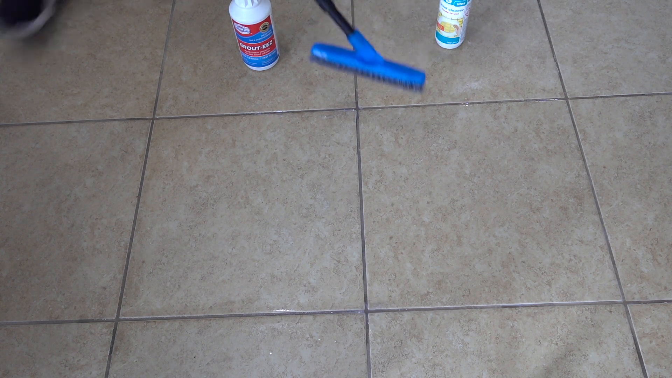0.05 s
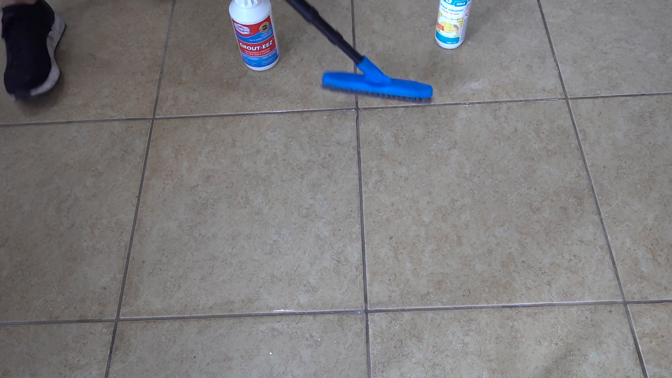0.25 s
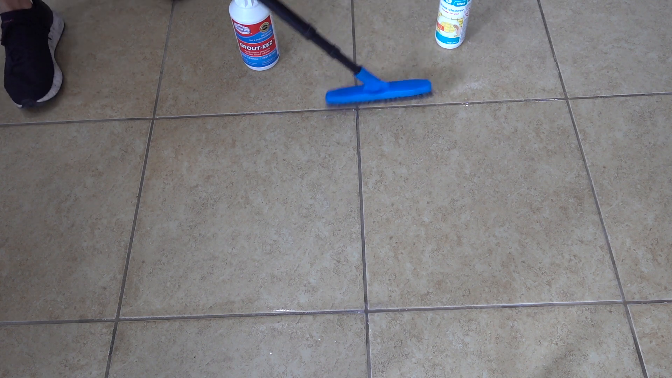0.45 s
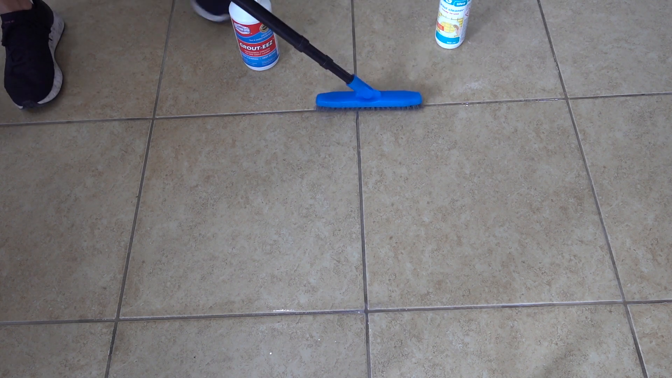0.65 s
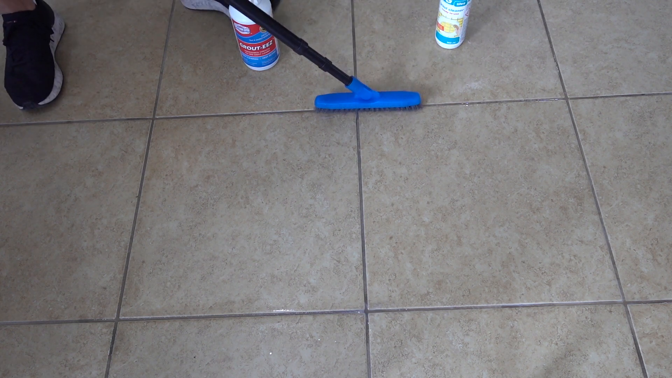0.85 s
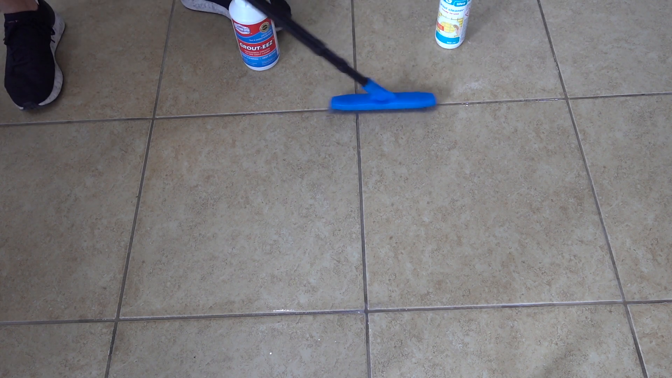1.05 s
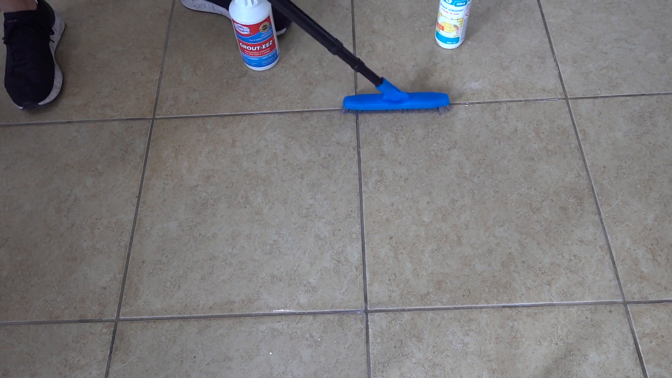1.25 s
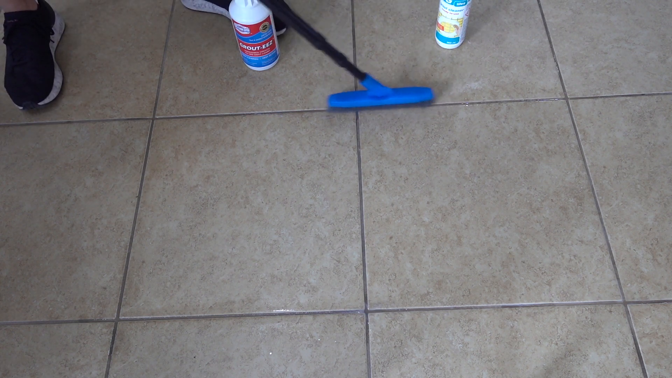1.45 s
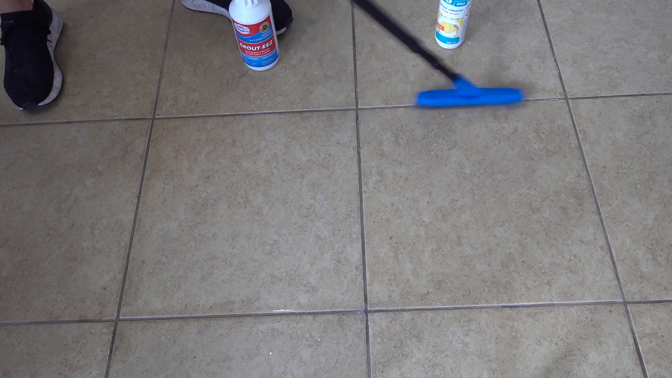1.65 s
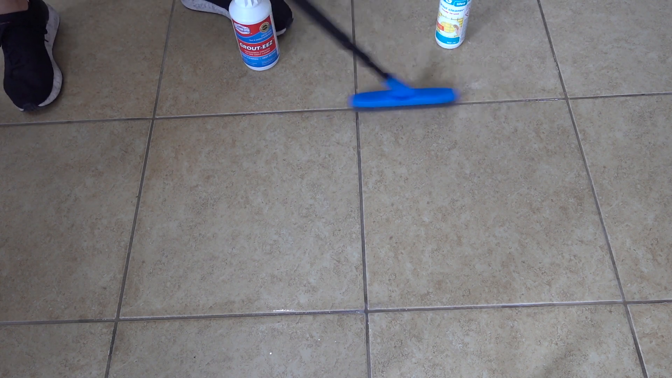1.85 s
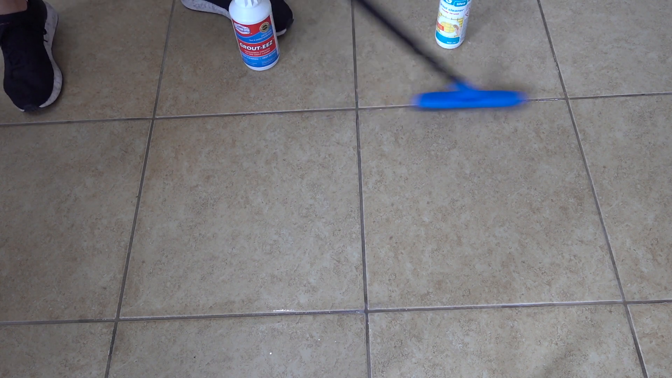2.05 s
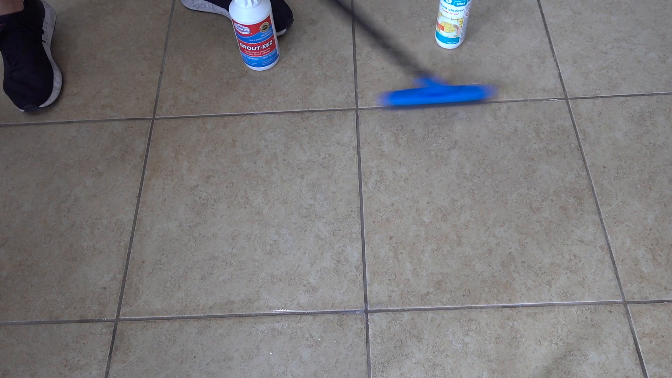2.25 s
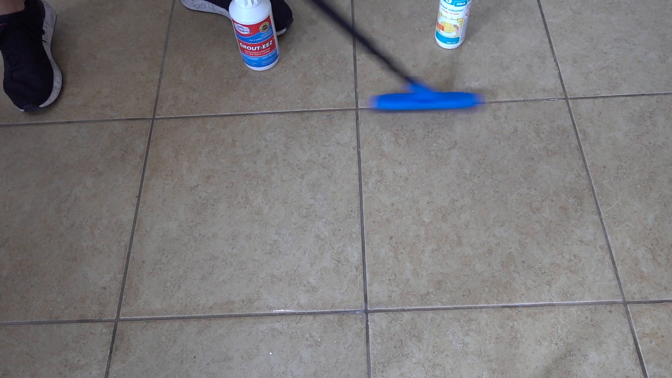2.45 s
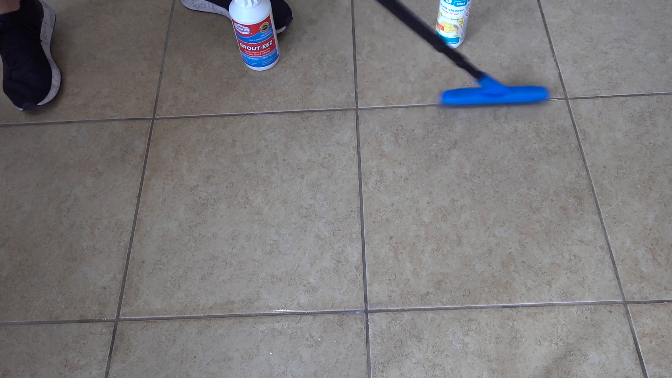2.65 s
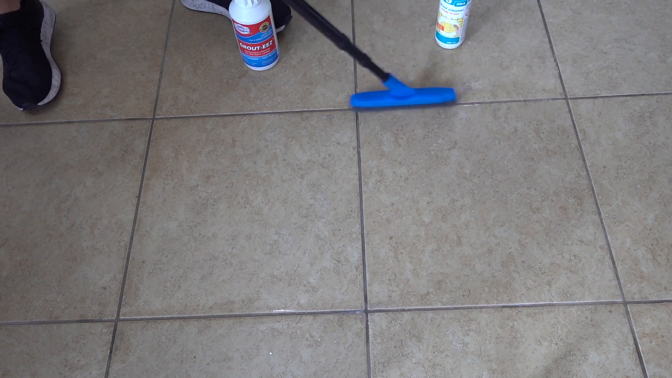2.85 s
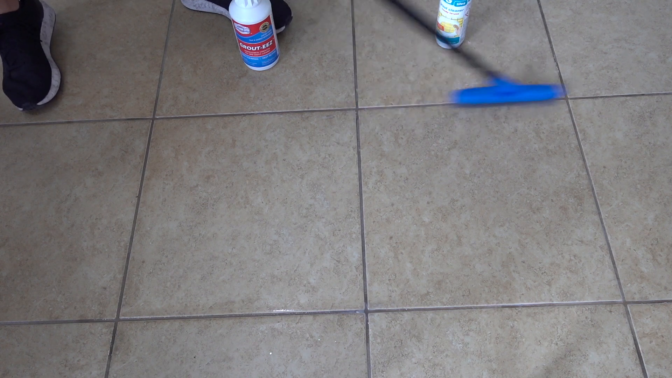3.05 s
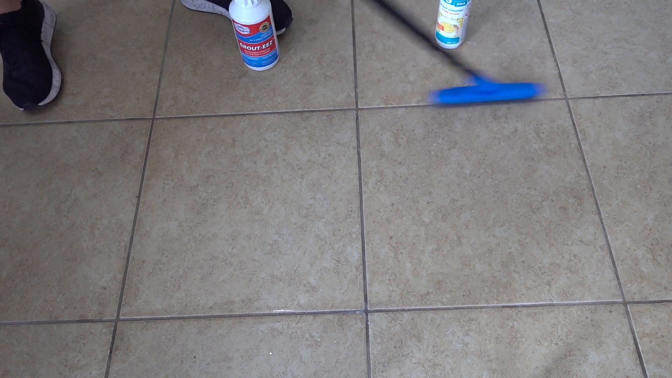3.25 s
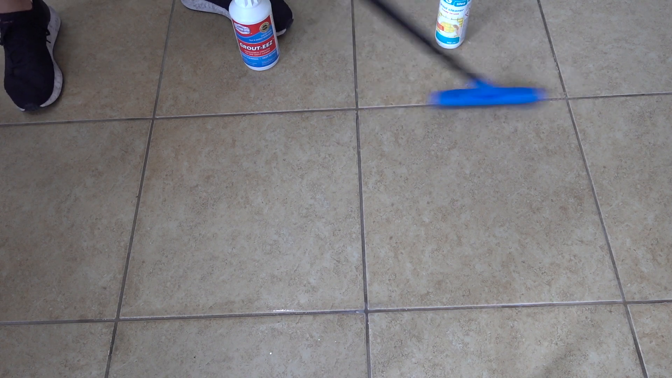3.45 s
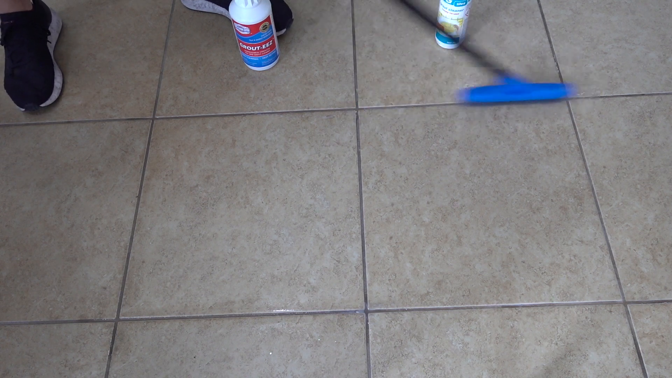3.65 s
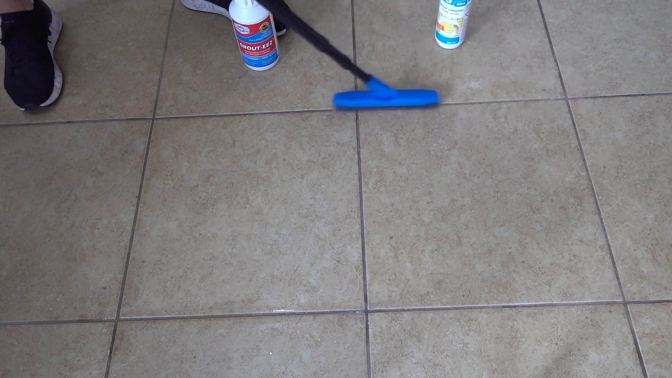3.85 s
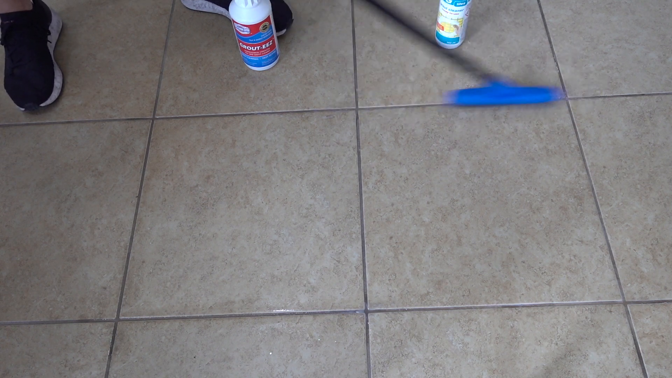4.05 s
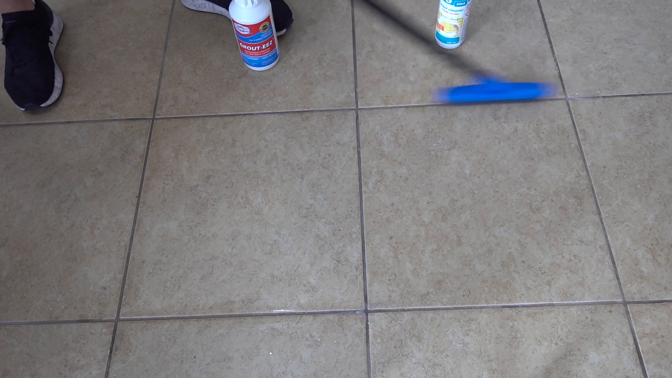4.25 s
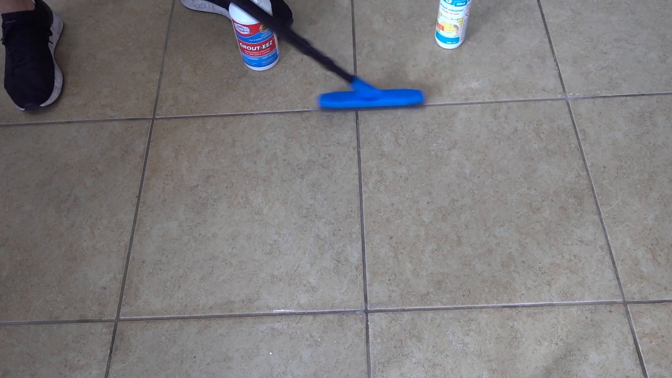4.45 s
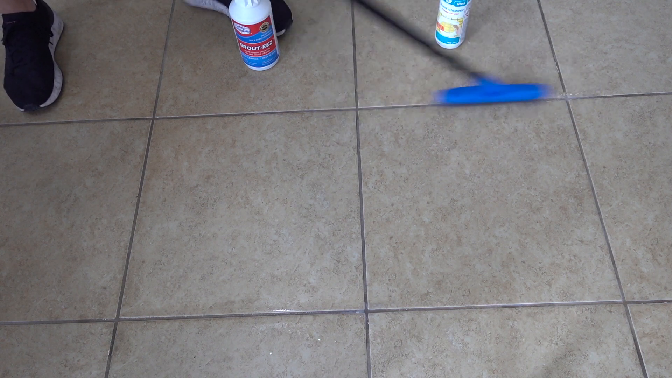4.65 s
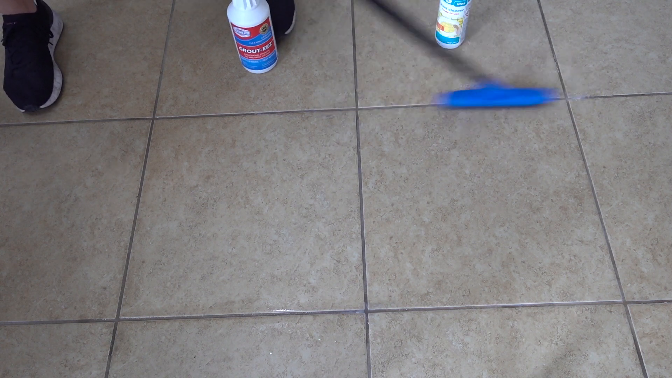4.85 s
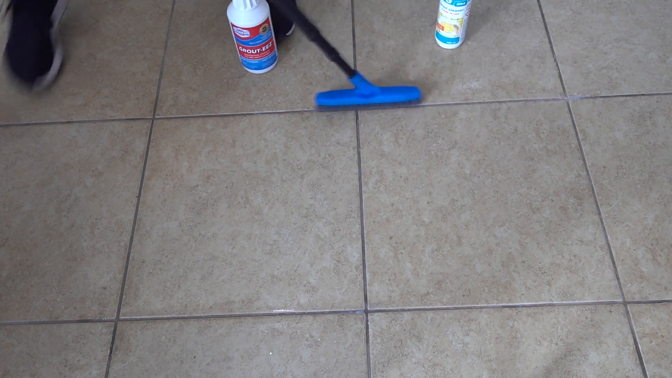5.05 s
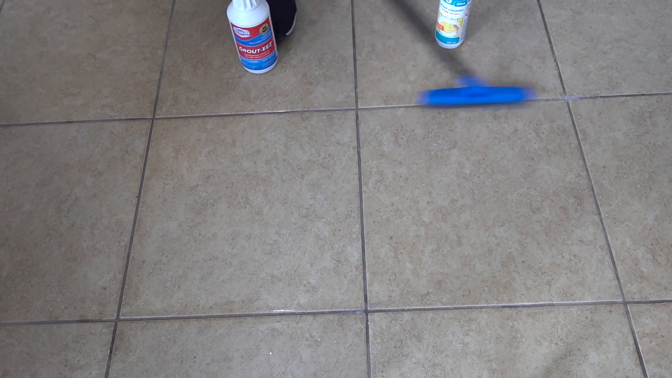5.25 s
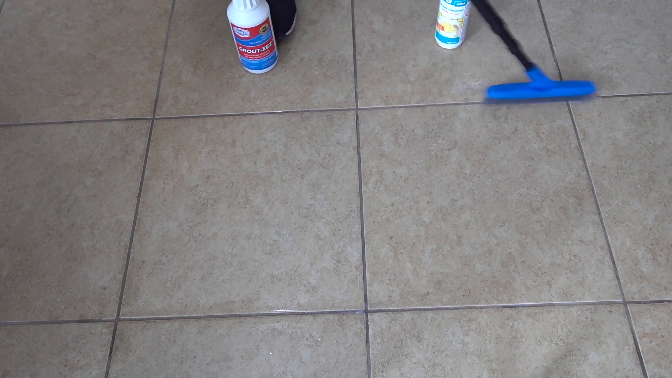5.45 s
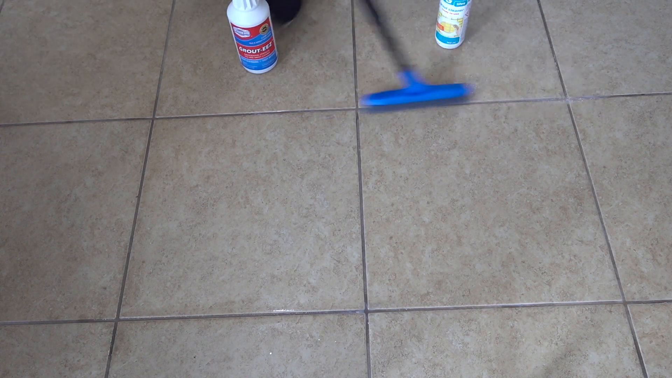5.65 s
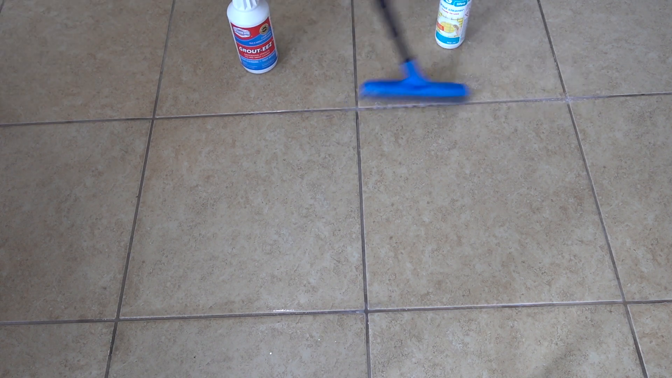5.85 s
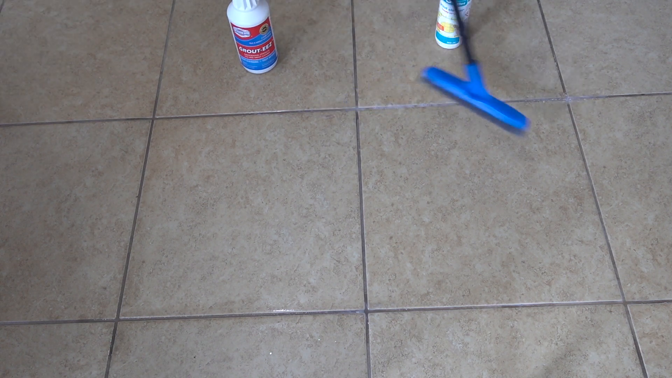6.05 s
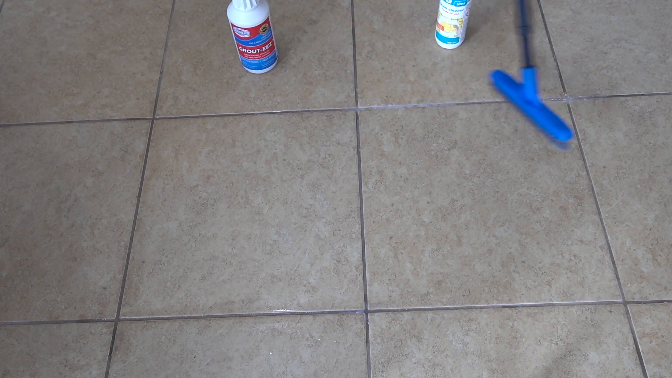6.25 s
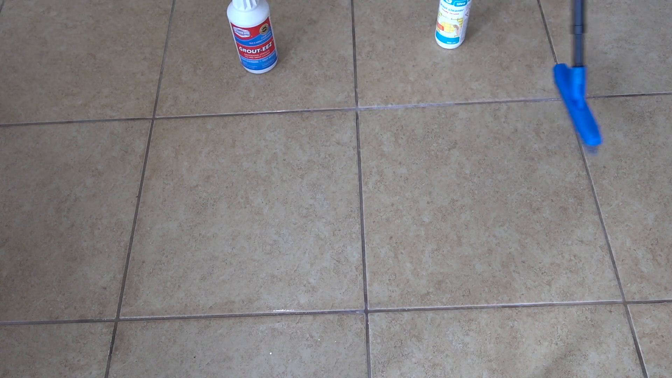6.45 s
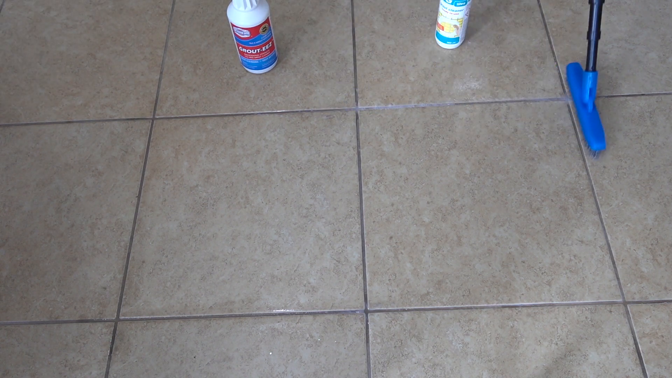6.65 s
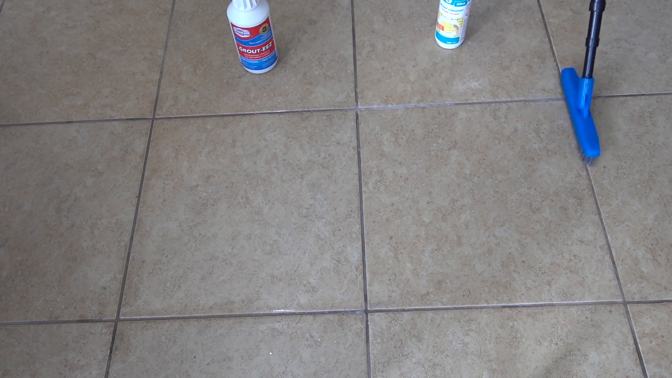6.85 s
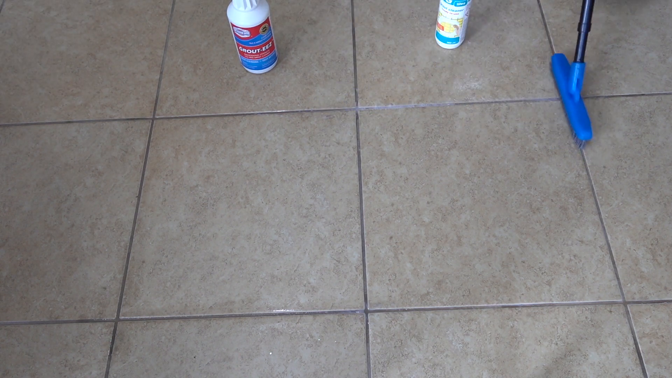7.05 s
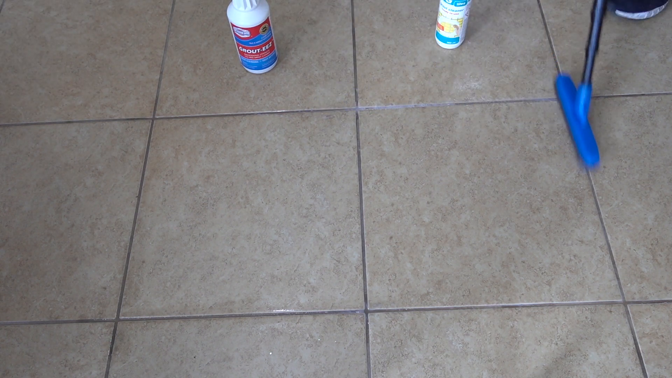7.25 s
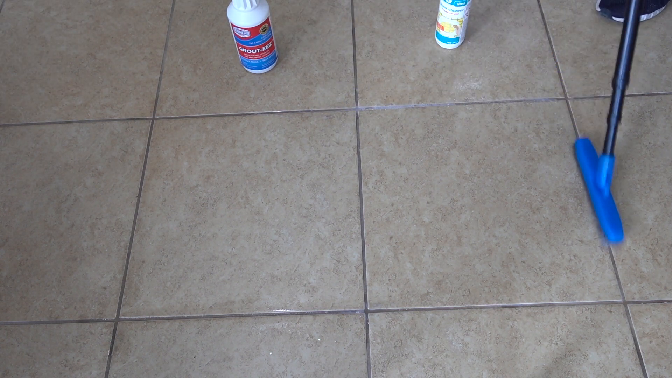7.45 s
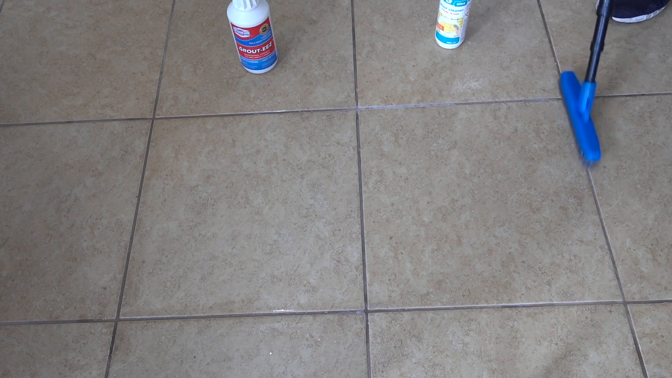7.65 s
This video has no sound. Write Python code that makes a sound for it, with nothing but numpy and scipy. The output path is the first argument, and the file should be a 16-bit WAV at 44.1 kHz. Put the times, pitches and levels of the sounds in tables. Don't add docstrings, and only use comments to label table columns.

```python
import sys
import numpy as np
from scipy import signal
from scipy.fft import rfft, irfft, next_fast_len
from scipy.io import wavfile
from scipy.ndimage import uniform_filter1d, map_coordinates

SR = 44100
rng = np.random.default_rng(int(sys.argv[2]) if len(sys.argv) > 2 else 0)


def generate_wav(signal):
    frames = np.transpose(np.atleast_2d(signal))
    scaled = np.clip(frames, -1, 1) * 32767
    pcm = np.round(scaled).astype(np.int16)
    wavfile.write(sys.argv[1], SR, pcm)


def nominal_scale(level):
    x = np.asarray(level, float) / 20
    return 10 ** x


N = 340452


def unit(x):
    return x / np.sqrt(np.mean(x ** 2) + 1e-20)


def along(points, hz):
    f, v = np.transpose(points)
    return np.interp(np.log(hz + 1), np.log(f + 1), v)


def wobble(rate_hz):
    knots = rng.standard_normal(int(N * rate_hz / SR) + 4)
    return map_coordinates(knots, [np.arange(N) * rate_hz / SR])


def sigmoid(x):
    return 1 / (1 + np.exp(np.clip(-x, -30, 30)))


def filtered(x, response):
    m = next_fast_len(len(x) + SR // 2)
    return irfft(rfft(x, m) * response(np.fft.rfftfreq(m, 1 / SR)), m)[:len(x)]


def modes(table):
    def response(f):
        total = 0
        for k, (centre, width, db) in enumerate(table):
            resonance = 1j * f * width / (centre * centre - f * f + 1j * f * width)
            total = total + (-1) ** k * nominal_scale(db) * resonance
        return total
    return response


def colour(spectrum):
    return lambda f: nominal_scale(along(spectrum, f))


def slips(share, spread_db):
    kick, size = rng.standard_normal((2, N))
    return (rng.random(N) < share) * kick * nominal_scale(spread_db * size)


def patchy(x, depth_db):
    z = signal.stft(x, nperseg=512)[2]
    field = uniform_filter1d(rng.standard_normal(z.shape), size=8, axis=0)
    field = uniform_filter1d(field, size=14, axis=1)
    return signal.istft(z * nominal_scale(depth_db * unit(field)), nperseg=512)[1][:N]


# (frequency [Hz], t60 [s])
ROOM_T60 = [(200, 0.29), (1000, 0.696), (3000, 0.746), (6000, 0.86), (10000, 0.48)]


def room(x, wet_db, early_db):
    hz, t, z = signal.stft(rng.standard_normal(SR // 2), SR, nperseg=256)
    t60 = along(ROOM_T60, hz)[:, None]
    late = nominal_scale(wet_db - 60 * t / t60) / np.sqrt(t60)
    early = nominal_scale(early_db - 60 * t / 0.0976) / np.sqrt(.12)
    tail = signal.istft(z * (late + early), SR, nperseg=256)[1] * np.sqrt(6 * np.log(10) / SR)
    return signal.fftconvolve(np.pad(x, (SR // 300, 0)), tail)


def renewed_room(x, wet_db, early_db):
    out, hop = np.pad(x, (0, SR)), SR // 3
    for i in range(0, N, hop):
        answer = room(x[i:i + hop], wet_db, early_db)
        out[i:][:len(answer)] += answer
    return out[:N]


# (frequency [Hz], density [dB])
AIR_TONE = [(59, -28.5), (100, -2.5), (287, -1.5), (348, 0.5), (531, -5), (779, -8.5), (1210, -10),
            (1580, -14), (5100, -19), (9800, -26.5), (12700, -55.5), (21600, -120)]
# (frequency [Hz], width [Hz], level [dB])
MACHINE_HUM = [(129.9, 12, 0.5), (235.4, 20, -7.5), (621.7, 60, -12.5)]
# (frequency [Hz], density [dB])
RUMBLE = [(15, -19), (28, -7), (52, 1), (80, -5), (110, -11), (200, -33.5)]
# (time [s], width [s], level over the calm [dB])
STIRRED_AIR = [
    (.77, 0.066, 6),
    (3.6, 2.6, 4.5),
    (5.2, 0.106, 4),
    (5.6, .4, 2.5),
    (6.23, 0.063, 6),
    (6.23, 0.014, 2.5),
    (6.41, 0.049, 9),
    (6.9, 0.095, 4),
    (7.6, 0.28, 5),
]
AIR_DB, HUM_DB, RUMBLE_DB = -52.5, -62, -58


def air():
    tone = unit(patchy(filtered(rng.standard_normal(N), colour(AIR_TONE)), depth_db=2.32))
    hum = unit(filtered(rng.standard_normal(N), modes(MACHINE_HUM)))
    lumps = unit(nominal_scale(wobble(6.6)) * filtered(rng.standard_normal(N), colour(RUMBLE)))
    t = np.arange(N) / SR
    stir_db = RUMBLE_DB + sum(db * np.exp(-((t - s) / width_s) ** 2) for s, width_s, db in STIRRED_AIR)
    out = nominal_scale(AIR_DB - 2.5 + 0.34 * wobble(3.8)) * tone
    out += nominal_scale(HUM_DB + 1.3 * wobble(2.912)) * hum
    return out + nominal_scale(stir_db + 1.9 * wobble(4.5)) * lumps


# (time [s], fade by 20 dB [s], thump [dB], drag re thump [dB], scuff re thump [dB])
SHOE_SHIFTS = [
    (1.17, 0.28, -61, 3, 10),
    (4.97, 0.166, -34.5, -5.5, -4.5),
    (5.065, .09, -48, 5, 4),
    (7.4, 0.6, -58, -1, 9.5),
    (5.625, 0.153, -46, -1.5, 1.5),
    (5.76, 0.1236, -58, -3, 11),
    (5.975, 0.07, -50, 2.5, -3.5),
    (6.195, 0.0943, -47.5, -10.5, 0.5),
    (6.335, 0.01, -46, -16, -5.5),
]
SHOE_ATTACK_S, LINGER = 0.0174, 1.35


def shifts():
    gains, t = np.zeros((3, N)), np.arange(N) / SR
    stretch = np.array([[1], [LINGER], [LINGER]])
    for s, fade_s, sole_db, drag_db, scuff_db in SHOE_SHIFTS:
        u = np.clip(t - s, 0, None)
        swell = 1 - np.exp(-(u / SHOE_ATTACK_S) ** 2)
        level_db = sole_db + np.array([[0], [drag_db], [scuff_db]])
        gains += nominal_scale(level_db - 20 * u / (fade_s * stretch)) * swell
    return gains


# (frequency [Hz], width [Hz], level [dB])
SOLE_MODES = [(132, 54, -1), (243.8, 115, 0.5)]
# (frequency [Hz], width [Hz], level [dB])
DRAG_MODES = [(446, 110, 0)]
# (frequency [Hz], density [dB])
SCUFF_COLOUR = [(300, -14.5), (600, -2), (1200, 1.5), (1700, -3.5), (3000, -22)]


def shoes():
    thump, pull, rub = shifts()
    sole = filtered(slips(0.046, spread_db=1.0), lambda f: modes(SOLE_MODES)(f) ** 2)
    sole = unit(nominal_scale(0.9 * wobble(36)) * sole)
    drag = unit(filtered(slips(.05, spread_db=3.5), lambda f: modes(DRAG_MODES)(f) ** 2))
    scuff = unit(filtered(slips(0.11, spread_db=3.0), colour(SCUFF_COLOUR)))
    return renewed_room(thump * sole + pull * drag + rub * scuff, wet_db=-5.5, early_db=-10.0)


# (time [s], body [dB], shell [dB], edge [dB], contact [ms])
FLAT_KNOCKS = [
    (.372, -50, -53.5, -66.5, 0.92),
    (.362, -44, -48.5, -60.5, 1.03),
    (.668, -29, -32, -42.5, 1.69),
    (0.7226, -20, -29, -34.5, 4.4),
    (0.7324, -26.5, -42, -38.5, 1.92),
    (6.889, -31, -26, -35, 1.77),
    (6.8912, -18.5, -18.5, -31.5, 1.1),
    (6.899, -27, -35.5, -37, 3.98),
]
# (time [s], body [dB], shell [dB], edge [dB], contact [ms])
END_TOUCHES = [
    (.585, -48, -52, -61.5, 1.9),
    (0.601, -59, -39.5, -45, 0.97),
    (.691, -38, -56.5, -47.5, 3.5),
    (.861, -60, -42.5, -48.5, 2.5),
    (1.1274, -55.5, -46.5, -34.5, 0.594),
    (1.132, -43.5, -49.5, -38.5, .6),
    (6.395, -40.5, -44, -59.5, 9.5),
    (6.675, -45, -62, -66, 2.64),
]
TOUCH_PITCH = 1.208
# (time [s], body [dB], shell [dB], contact [ms], pitch factor)
DULL_THUDS = [
    (1.091, -59, -66, 2.8, 0.64),
    (1.107, -58.5, -68, 3.7, 0.43),
    (4.981, -41, -72.5, 4.6, 0.374),
    (4.996, -32, -68, 10, 0.22),
    (5.019, -34, -69.5, 5.3, 0.47),
    (6.198, -34.5, -35, 0.48, 0.536),
    (7.425, -32, -45.5, 2.97, 0.486),
]
THUD_EDGE_DB = -20
# (frequency [Hz], width [Hz], level [dB])
BODY_MODES = [(211.3, 26.3, -5), (362.3, 98, -5), (597, 56.6, 2.5), (813, 87, -0.5), (1118, 147, -6)]
# (frequency [Hz], width [Hz], level [dB])
SHELL_MODES = [(1370, 450, -5), (2232, 273, 3.5), (2944, 410, -3), (3823, 580, -6.5)]
# (frequency [Hz], width [Hz], level [dB])
EDGE_MODES = [(5850, 1450, -1.5), (7300, 1500, -2.5), (8550, 1300, -8)]
KNOCK_GAIN_DB = 14.5


def knocks():
    out, t = np.zeros(N + SR), np.arange(SR // 10) / SR
    contacts = [(*row, 1) for row in FLAT_KNOCKS]
    contacts += [(*row, TOUCH_PITCH) for row in END_TOUCHES]
    for s, body_db, shell_db, ms, pitch in DULL_THUDS:
        contacts.append((s, body_db, shell_db, shell_db + THUD_EDGE_DB, ms, pitch))
    impulse = 1. * (t == 0)
    for s, body_db, shell_db, edge_db, ms, pitch in contacts:
        u = t / (ms / 1000)
        rattle = rng.standard_normal(len(t)) * np.sqrt(u) * np.exp(-u)
        blow = np.arange(len(t)) == np.argmax(u > .5)
        force = rattle / np.linalg.norm(rattle) + 0.72 * blow
        direct, clean_ring = np.zeros((2, len(t)))
        for db, table in ((body_db, BODY_MODES), (shell_db, SHELL_MODES), (edge_db, EDGE_MODES)):
            ring = lambda f: modes(table)(f / pitch)
            near, far = filtered(force, ring), filtered(impulse, ring)
            direct = direct + nominal_scale(db + KNOCK_GAIN_DB) * near / np.linalg.norm(near)
            clean_ring = clean_ring + nominal_scale(db + KNOCK_GAIN_DB) * far / np.linalg.norm(far)
        answer = room(clean_ring, wet_db=-5.5, early_db=-9)
        start = round(s * SR)
        out[start:][:len(direct)] += direct
        out[start:][:len(answer)] += answer
    return out[:N]


# (time [s], length [s], share before top speed, tip hiss [dB], bending re tips [dB])
BRUSH_STROKES = [(1.134, 0.3393, 0.447, -35.5, -4.5), (1.38, .2, .5, -50, -3),
                 (1.531, 0.129, 0.511, -33.5, -8), (1.666, 0.2525, 0.475, -26.5, -1),
                 (1.927, 0.189, 0.381, -23, -5), (2.118, 0.2463, 0.452, -26, 3),
                 (2.359, 0.2284, 0.44, -21, -4), (2.578, 0.278, 0.471, -25, 3),
                 (2.85, 0.231, 0.446, -21.5, -4), (3.068, 0.3042, 0.47, -22, 0.5),
                 (3.371, 0.212, 0.363, -20.5, -4.5), (3.582, 0.2194, 0.44, -21, -2),
                 (3.807, 0.276, 0.356, -19, -4.5), (4.075, 0.3138, 0.431, -20.5, -1),
                 (4.373, 0.298, 0.489, -19.5, -8), (4.661, 0.3486, 0.403, -19.5, -6.5),
                 (4.989, 0.3032, 0.357, -19.5, -7.5), (5.278, 0.404, 0.4414, -20.5, -3),
                 (5.651, 0.428, 0.301, -21.5, -7.5), (7.025, 0.3085, .68, -40.5, -11),
                 (7.22, .2, .5, -50, -3), (7.301, 0.374, 0.778, -25.5, -0.5),
                 (7.68, 0.213, 0.388, -21.5, -5)]
LIGHT_DB = -28
SLOW_S, SOFTEN_PER_S, SOFTEN_PER_DB = 0.176, 12.8, 0.2536
FLIP_S = 0.0389


def strokes(law, offset_db, share, grows=1):
    shift, rise, fall = law
    power, t = np.zeros(N), np.arange(N) / SR
    for s, length_s, top, tips_db, bend_db in BRUSH_STROKES:
        i, j = round(s * SR), round((s + length_s) * SR)
        u, at = (t[i:j] - s) / length_s, np.clip(top + shift, .1, .9)
        speeding_up = u < at
        ramp = np.where(speeding_up, u / at, (1 - u) / (1 - at))
        speed = np.sin(np.pi / 2 * np.clip(ramp, 0, 1))
        phase_s = length_s * np.where(speeding_up, top, 1 - top)
        soft = 1 + SOFTEN_PER_S * np.clip(phase_s - SLOW_S, 0, None)
        soft = soft + SOFTEN_PER_DB * max(LIGHT_DB - tips_db, 0)
        gain = nominal_scale(grows * tips_db + offset_db + share * bend_db)
        power[i:j] += (gain * speed ** (soft * np.where(speeding_up, rise, fall))) ** 2
    return 10 * np.log10(np.abs(uniform_filter1d(power, size=round(FLIP_S * SR))) + 1e-12)


# (frequency [Hz], width [Hz], level [dB])
PULLED_MODES = [(2125, 870, -21.5), (2741, 488.5, -3), (3009, 678, 0), (3680, 1309, -5.5)]
# (frequency [Hz], width [Hz], level [dB])
PUSHED_MODES = [(1999, 750, -13), (2515, 497, -2), (2890, 583, 0.5), (3709, 1186, -7)]
# (frequency [Hz], width [Hz], level [dB])
TIP_MODES = [(7538, 1407, -2.5), (8677, 1123, -0.5), (9620, 517, -4)]
# (frequency [Hz], density [dB])
SCRAPE_COLOUR = [(2000, -27), (3500, -7), (4500, -0.5), (5500, 1), (6800, 0), (8000, -17.5), (11000, -13)]
# (frequency [Hz], density [dB])
DRONE_COLOUR = [(250, -12.5), (410, -2), (520, -10.5), (700, -4.5), (1000, -1), (1350, 1), (1900, 0),
                (2400, 3.5), (3500, -44.5)]
# (frequency [Hz], width [Hz], level [dB])
BITE_MODES = [(1370, 360, 0)]
TIPS_LAW, BEND_LAW = (-0.04, 0.718, 1), (-0.033, 1.198, 1.502)
SCRAPE_LAW, DRONE_LAW = (0.065, 0.7, 0.726), (-0.054, 0.513, 0.403)
STRAIGHTEN_S = 0.0266
SKIP_DB = 0.1028


def brush():
    bend_db = strokes(BEND_LAW, 0, share=0.991)
    tip_level_db = strokes(TIPS_LAW, 0, share=0)
    tips_db = tip_level_db - bend_db
    scrape_db = strokes(SCRAPE_LAW, 1, share=0.274, grows=1.1255) - bend_db
    drone_db = strokes(DRONE_LAW, -25.5, share=0.662, grows=0.6302) - bend_db

    steep = lambda f: f ** 2 / (f ** 2 + 2000 ** 2)
    pulled = unit(filtered(slips(.6, spread_db=1.44), lambda f: modes(PULLED_MODES)(f) * steep(f)))
    pushed = unit(filtered(slips(.6, spread_db=1.44), lambda f: modes(PUSHED_MODES)(f) * steep(f)))
    slope_db_per_s = np.gradient(bend_db) * SR
    push = sigmoid((1.0 + STRAIGHTEN_S * slope_db_per_s - tips_db) / 2.3)
    bend = np.sqrt(1 - push) * pulled + np.sqrt(push) * pushed
    tips = unit(filtered(slips(.7, spread_db=2.0), lambda f: modes(TIP_MODES)(f) * steep(f / 2.63)))
    scrape = unit(patchy(filtered(slips(.6, spread_db=1.6), colour(SCRAPE_COLOUR)), depth_db=1.0))
    drone = unit(patchy(filtered(slips(.2, spread_db=1.0), colour(DRONE_COLOUR)), depth_db=1.83))
    bite = unit(filtered(slips(0.11, spread_db=1.0), modes(BITE_MODES)))

    rising = np.clip(uniform_filter1d(np.gradient(tip_level_db) * SR, size=2600) / 250, 0, 1)
    firm_pull = nominal_scale(np.minimum(tip_level_db - LIGHT_DB, 0)) * sigmoid((tips_db - 3.5) / 1.5)
    handle = nominal_scale(0.49 * wobble(15)) * drone + 1.5 * rising * firm_pull * bite
    layers = nominal_scale(0.4 * wobble(25) - 0.1956) * bend
    layers += nominal_scale(tips_db + 0.0031 + 0.73 * wobble(30)) * tips
    layers += nominal_scale(scrape_db - 0.5 + 0.8 * wobble(25)) * scrape
    layers += nominal_scale(drone_db - 0.59) * handle
    tremble_db = 0.454 + SKIP_DB * np.clip(LIGHT_DB - tip_level_db, 0, 20)
    pressure = nominal_scale(bend_db - 1.2273 + tremble_db * wobble(60))
    return renewed_room(pressure * layers, wet_db=-9.5, early_db=-27.0)


def scene():
    return (air() + shoes() + knocks() + brush())[None]


def roll_off(x):
    return signal.sosfilt(signal.butter(12, 15830, fs=SR, output="sos"), x)


MIC_TOP_HZ, HISS_DB = 10050, -62.0
# (frequency [Hz], level [dB])
HISS_MASK = [(10200, -46), (12000, -41.5), (13600, -36.5), (14300, -32), (15800, -28.5)]


def record(dry):
    kept = filtered(dry[0], lambda f: 1 / (1 + (f / MIC_TOP_HZ) ** 160))
    treble = filtered(kept, lambda f: f > 6500)
    hz, t, z = signal.stft(nominal_scale(HISS_DB) * rng.standard_normal(N), SR, nperseg=2048)
    loud_db = 10 * np.log10(np.abs(uniform_filter1d(treble ** 2, size=2048)) + 1e-12)
    loud_db = loud_db[np.minimum((t * SR).astype(int), N - 1)]
    band_hz = np.round(hz / 690) * 690
    spared = (loud_db < along(HISS_MASK, band_hz)[:, None]) | (hz < MIC_TOP_HZ)[:, None]
    hiss = signal.istft(z * spared, SR, nperseg=2048)[1][:N]
    return roll_off((kept + hiss)[None])


dry = scene()
out = record(dry)
generate_wav(out)
```